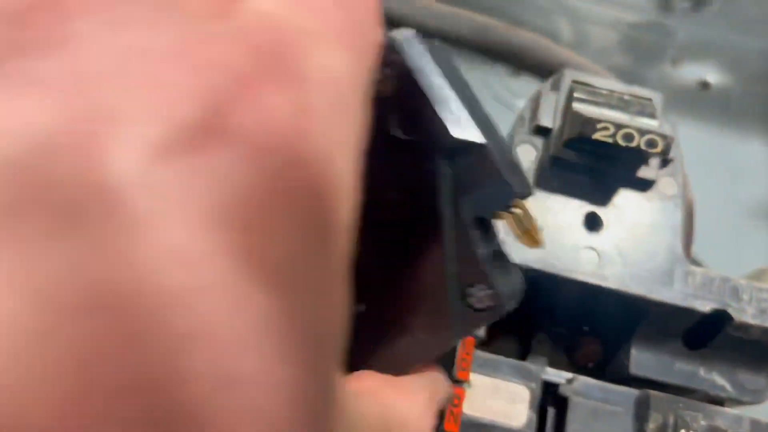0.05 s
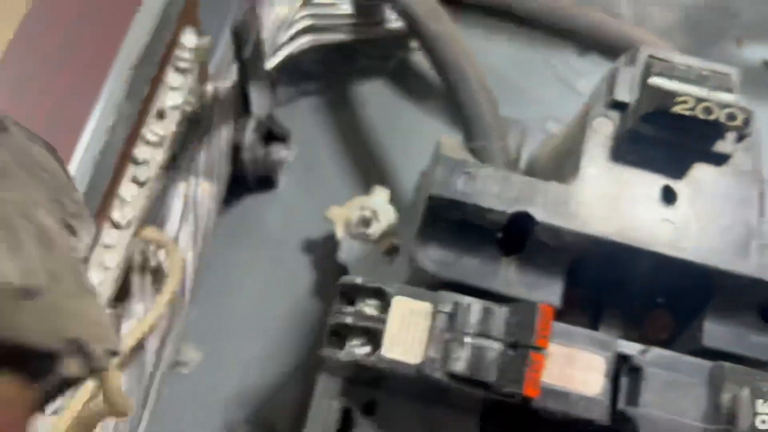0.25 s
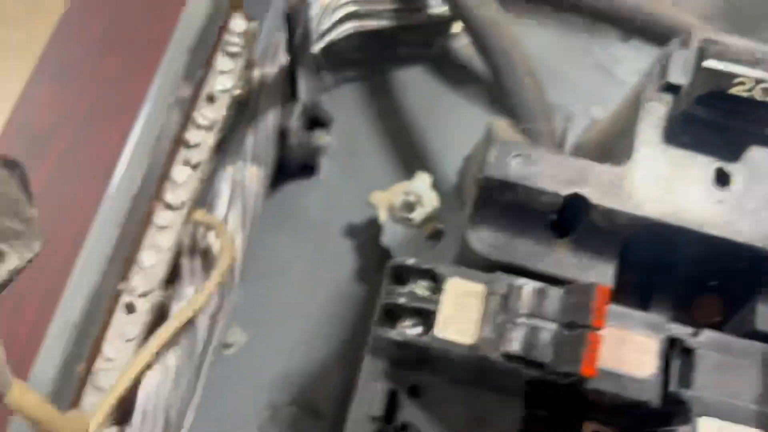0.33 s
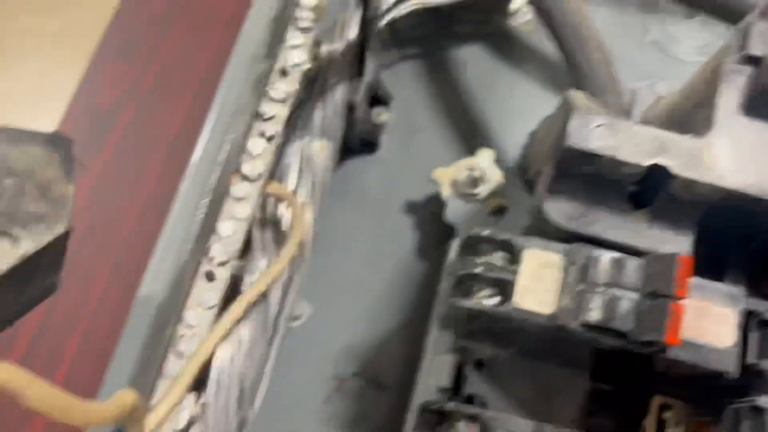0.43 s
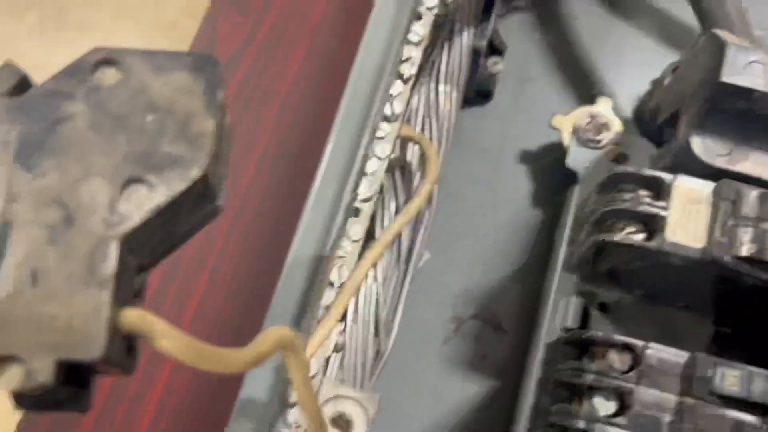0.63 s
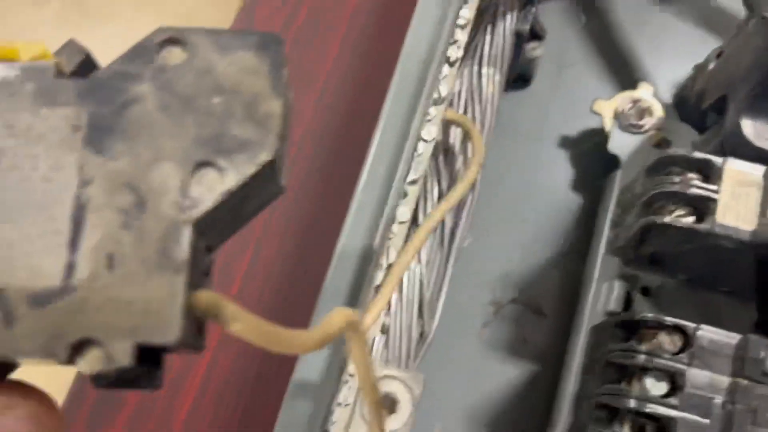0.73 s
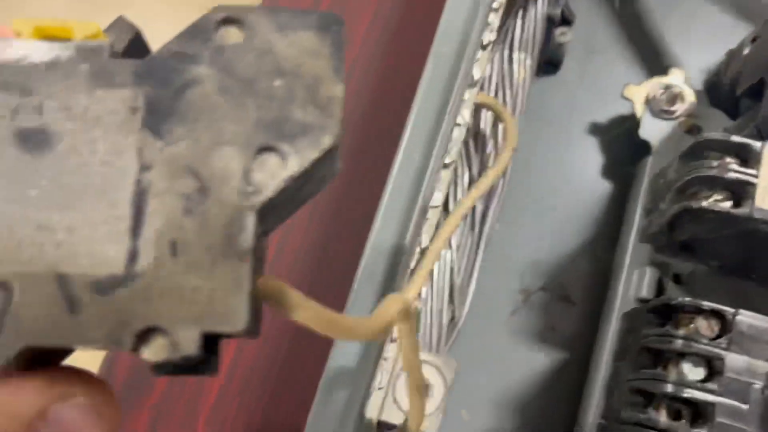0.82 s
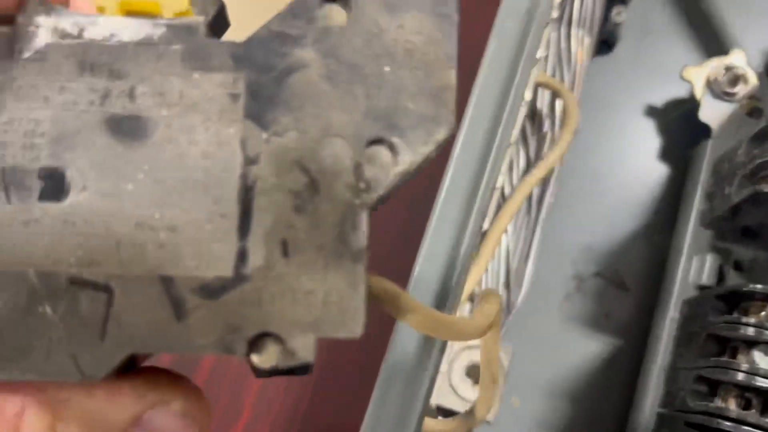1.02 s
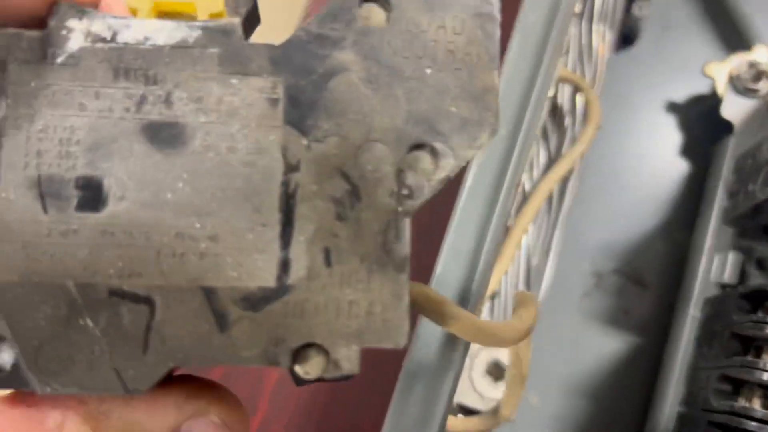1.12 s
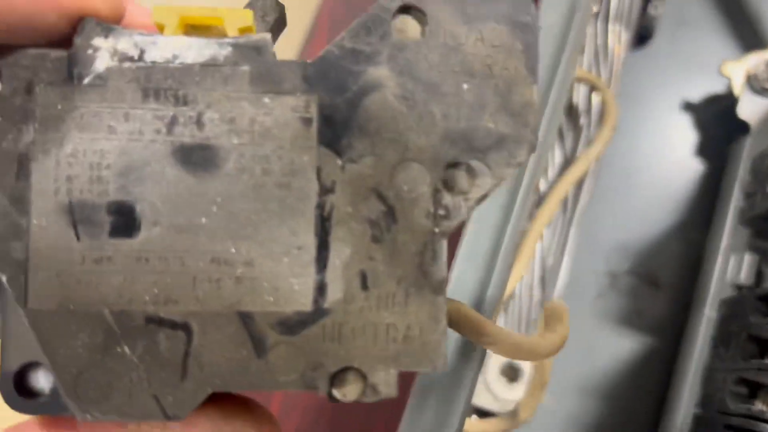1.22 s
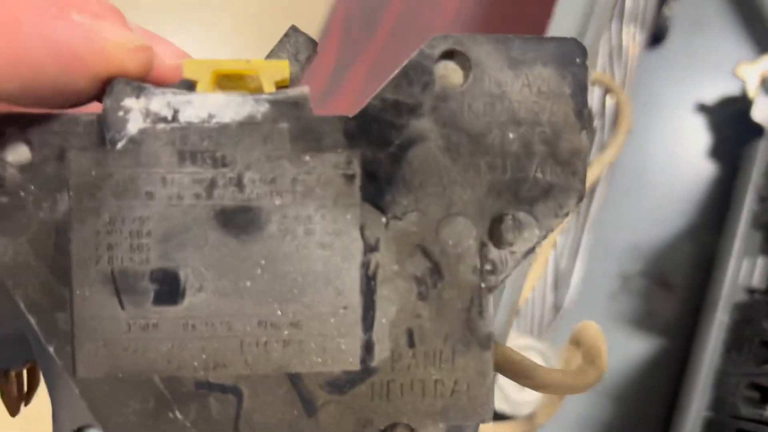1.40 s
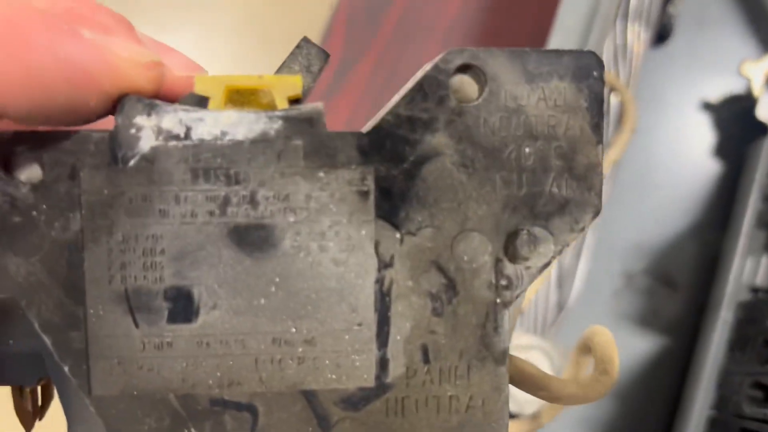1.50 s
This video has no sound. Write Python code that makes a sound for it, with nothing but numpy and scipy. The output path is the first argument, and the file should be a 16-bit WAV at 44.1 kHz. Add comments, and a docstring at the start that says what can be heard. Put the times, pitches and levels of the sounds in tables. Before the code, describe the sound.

One sharp plastic clack as a breaker is pulled free from its metal panel.

```python
"""In a quiet, hard-walled room, a plastic circuit breaker is pulled from a steel panel near the microphone.
Friction hisses and small impacts tick as it slides, then it knocks in its seat and snaps off its clip.
Both blows excite damped modes of the breaker and its mounting, and the release sets the cabinet booming.
The room reverberates over a low rumble and hum while the hand turns the part with faint ticks and rubs."""
import sys
import numpy as np
from scipy import signal
from scipy.fft import rfft, irfft
from scipy.io import wavfile
from scipy.ndimage import uniform_filter1d

SR = 44100
rng = np.random.default_rng(int(sys.argv[2]) if len(sys.argv) > 2 else 0)


def to_wav(s):
    """Save 16-bit WAV."""
    ch = np.atleast_2d(s).T  # columns
    pcm = np.round(np.clip(ch, -1, 1) * 32767)  # PCM
    wavfile.write(sys.argv[1], SR, pcm.astype(np.int16))


N = 68355
T = np.arange(N) / SR
FREQS = np.maximum(np.fft.rfftfreq(2 * N, 1 / SR), 1)

# stereo width of the direct sound: f/Hz, side level re mid/dB
DIRECT_WIDTH = [(100, -21), (500, -5), (3000, -2), (12000, -10)]
# stereo width of the diffuse field: f/Hz, side level re mid/dB
DIFFUSE_WIDTH = [(50, -20), (130, -13.5), (300, -7.5), (600, 1.5), (10000, -1.5)]


def undb(db):
    """Amplitude ratio of a level in decibels."""
    return 10 ** (np.asarray(db) / 20)


def curve(table, hz=FREQS, column=1):
    """Interpolation of a table column over log frequency."""
    rows = np.array(table)
    return np.interp(np.log(hz), np.log(rows[:, 0]), rows[:, column])


def bell(hz, octaves):
    """Gaussian band in log frequency, with its standard deviation in octaves."""
    return np.exp(-.5 * (np.log2(FREQS / hz) / octaves) ** 2)


def filtered(x, gain):
    """Linear filtering: the spectrum is multiplied by a frequency response."""
    return irfft(rfft(x, 2 * N) * gain)[..., :N]


def noise(gain, width):
    """Coloured stereo noise, rms near 1: sum and difference of independent mid and side signals."""
    spectra = rfft(rng.standard_normal((2, 2 * N))) * gain / np.sqrt(np.mean(gain ** 2))
    spectra[1] *= undb(curve(width))
    mid, side = irfft(spectra)[:, :N]
    return np.array([mid + side, mid - side])


def drift(per_s):
    """Slow random fluctuation: smoothed steps with a spread near 1."""
    hold = int(SR / per_s)
    steps = np.repeat(rng.standard_normal(256), hold)[:N]
    return 1.3 * uniform_filter1d(uniform_filter1d(steps, hold), hold)


def decay(t60):
    """Exponential damping by 60 dB in t60 seconds."""
    return undb(-60 * T / t60)


def rise(tau_s):
    """First-order build-up with time constant tau_s."""
    return 1 - np.exp(-T / tau_s)


def delayed(x, start_s):
    """Time shift of a stereo sound to its onset."""
    return np.pad(x, ((0, 0), (int(start_s * SR), 0)))[:, :N]


def off_axis(x):
    """Level and phase differences between the two microphone ports put a near source to the right."""
    # right port re left: f/Hz, level/dB, phase lag/rad
    port_difference = [(100, 2, 0), (601.3, 4.5, -0.29), (2467, 4, -0.21), (4500, 4.5, 1.6),
                       (7630, 4, 0.89), (14000, -2.5, 1.96)]
    lean = undb(curve(port_difference) / 2)
    lag = curve(port_difference, column=2)
    return filtered(x, np.array([1 / lean, lean * np.exp(-1j * lag)]))


def modal_ring(modes, rise_cycles, t60_scale=1):
    """Superposition of damped modes, alternating in sign; the low ones build up last."""
    return sum((-1) ** k * undb(db) * np.sin(2 * np.pi * hz * T)
               * decay(t60 * t60_scale) * rise(rise_cycles / hz)
               for k, (hz, db, t60) in enumerate(modes))


def dense_modes(table, width, t60_scale=1):
    """Modal overlap: countless modes merge into noise, each octave decaying at its own rate."""
    spectrum = rfft(noise(undb(curve(table)), width), 2 * N)
    out = 0
    for hz in 31.25 * 2 ** np.arange(10):
        band = np.maximum(1 - abs(np.log2(FREQS / hz)), 0)
        out += irfft(spectrum * band)[:, :N] * decay(t60_scale * curve(table, hz, column=2))
    return out


def background():
    """Ambient noise: a diffuse rumble and a low hum, randomly modulated in phase and amplitude."""
    # rumble spectrum: f/Hz, relative level/dB
    rumble_spectrum = [(20, -22), (40, -8.5), (62, -1.5), (100, -2), (170, -10), (400, -21), (800, -32),
                       (1600, -41), (3200, -50.5), (7000, -65), (15000, -71.5)]
    # hum envelope: t/s, relative level/dB
    hum_envelope = [(0.0, -4), (0.14, -0.5), (0.3, -4.5), (1.1, -7.5), (1.18, 7.5), (1.28, -17),
                    (1.36, 3.5), (1.55, 6)]
    hum_hz = 62.3
    hum = np.sqrt(2) * np.sin(2 * np.pi * hum_hz * T + drift(per_s=15))
    hum_db = -46.5 + np.interp(T, *np.array(hum_envelope).T) + drift(per_s=15)
    rumble = noise(undb(curve(rumble_spectrum)), DIFFUSE_WIDTH)
    return undb(hum_db) * hum + undb(-47) * rumble


def rubs():
    """Sliding friction of plastic and fingers: bands of hiss that swell and fade."""
    # strokes: onset t/s, duration/s, level/dB, centre f/Hz, width/octaves
    strokes = [(-0.08, .24, -63, 1600, 1.4), (0.035, 0.45, -64.5, 10090, 0.61),
               (0.134, 0.3, -64, 2760, 0.91), (1.124, 0.21, -84, 3000, 1.5), (1.347, .13, -76, 3000, 1.2)]
    out = 0
    for start, duration, db, hz, octaves in strokes:
        swell = np.sin(np.pi * np.clip((T - start) / duration, 0, 1))
        out += undb(db) * swell * noise(bell(hz, octaves), DIRECT_WIDTH)
    return out


def contact(start_s, relative_db, hz, octaves, t60):
    """Impact transient where two surfaces meet: a noise burst that starts more slowly the lower it is."""
    rise_cycles = 2.2
    burst = noise(bell(hz, octaves), DIRECT_WIDTH) * decay(t60) * rise(rise_cycles / hz)
    return undb(relative_db - 18) * delayed(burst, start_s)


def ticks():
    """Small impacts radiate brief transients: ticks of plastic and clip, and a soft bump of the hand."""
    # impacts: t/s, relative level/dB, centre f/Hz, width/octaves, T60/s
    impacts = [(0.0461, -22.5, 5000, 3.6, 0.025), (0.0642, -18, 7100, 1.63, 0.016),
               (0.213, -28, 4100, 0.75, 0.14), (0.2214, -22, 2990, 0.24, 0.062),
               (0.3323, 2, 9500, 0.48, 0.019), (0.836, -27, 233, 0.43, 0.17),
               (1.0536, -54.5, 5000, 0.57, .04), (1.1712, -33.5, 1880, .4, 0.046),
               (1.3655, -51, 3500, 1.4, 0.078)]
    return sum(contact(*impact) for impact in impacts)


def knocks():
    """Impulse excitation: each blow rings the same parts and the room; a softer contact is duller."""
    # blows: t/s, relative level/dB, contact low-pass f/Hz, high-pass f/Hz, T60 factor, mode rise/cycles
    blows = [(0.2127, -10, 950, 396.4, 0.92, 0.18), (0.3331, -2.5, 14070, 49.44, 0.99, 1.8)]
    # distinct modes of the breaker and its mounting: f/Hz, relative level/dB, T60/s
    breaker_modes = [(273.5, -35.5, .22), (385, -34.5, .2), (452, -36, .15), (575, -20, 0.15),
                     (654, -23.5, .19), (749, -26.5, 0.19), (846.7, -21.5, .12), (1499, -18.5, .06),
                     (1633, -13, .065), (2196, -14.5, 0.047), (2393, -13, 0.048), (2860, -15.5, .075),
                     (4310, -16, 0.028), (4840, -19, .04)]
    # dense, quickly damped modes between those: f/Hz, relative level/dB, T60/s
    clatter_bands = [(60.6, -26, .15), (200, -5, 0.2), (430, 0.5, 0.26), (1090, -4.5, .13),
                     (2130, -1, 0.14), (3100, -3, .13), (3800, -10.5, .12), (5960, -13, 0.083),
                     (9100, -12, .1), (13000, -16, .1), (16070, -29, .07)]
    # reverberant field of the room: f/Hz, relative level/dB, T60/s
    room_bands = [(50, -9.5, 2.4), (109, 1.5, 1.2), (180, -3, 1.1), (350, -16.5, 1.2), (720, -20, 1.1),
                  (1300, -27.5, 1.3), (2870, -26.5, 1.55), (3600, -32.5, 1.5), (5600, -34, 1.2),
                  (9000, -44, .8), (14000, -47.5, 0.54)]
    out = 0
    for start, db, contact_hz, highpass_hz, t60_scale, rise_cycles in blows:
        ring = undb(-2) * modal_ring(breaker_modes, rise_cycles, t60_scale)
        clatter = undb(-17.5) * dense_modes(clatter_bands, DIRECT_WIDTH, t60_scale)
        direct = off_axis((ring + clatter) * rise(tau_s=.0006))
        reverberation = undb(-31.5) * dense_modes(room_bands, DIFFUSE_WIDTH) * rise(tau_s=.015)
        lowpass = signal.butter(2, contact_hz, "low", fs=SR, output="sos")
        highpass = signal.butter(2, highpass_hz, "high", fs=SR, output="sos")
        knock = signal.sosfilt(highpass, signal.sosfilt(lowpass, direct + reverberation))
        out += undb(db) * delayed(knock, start)
    return out


def clip_snap():
    return contact(start_s=.3333, relative_db=4.5, hz=2500, octaves=1.2, t60=.019)


def cabinet_boom():
    """Free vibration of the steel box just after the release; modes close in frequency beat."""
    # low modes of the cabinet: f/Hz, level/dB, T60/s
    cabinet_modes = [(110.7, -36, 0.94), (117.9, -32.5, 1.0), (112.7, -18, 0.19), (151.8, -33.5, 0.6),
                     (186.4, -18, .07)]
    boom = modal_ring(cabinet_modes, rise_cycles=.68)
    return delayed(np.array([boom, boom]), start_s=.3425)


def scene():
    """Superposition: the pressures of all the sources add."""
    return off_axis(ticks() + clip_snap() + cabinet_boom()) + knocks() + rubs() + background()


def record(dry):
    """Frequency response of the microphone: uneven treble, then a steep low-pass."""
    # two dips and a slight peak: f/Hz, width/octaves, level/dB
    treble_response = [(9430, 0.077, -16.5), (12140, 0.062, 1.5), (14600, 0.076, -9)]
    response_db = sum(db * bell(hz, octaves) for hz, octaves, db in treble_response)
    cutoff_hz = 15800
    lowpass = signal.ellip(8, .2, 80, cutoff_hz, fs=SR, output="sos")
    return signal.sosfilt(lowpass, filtered(dry, undb(response_db)))


dry = scene()
out = record(dry)
to_wav(out)
```